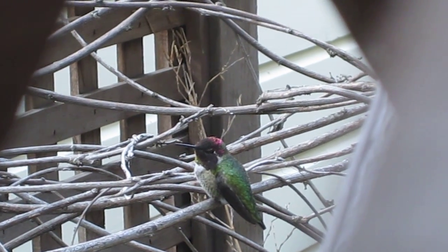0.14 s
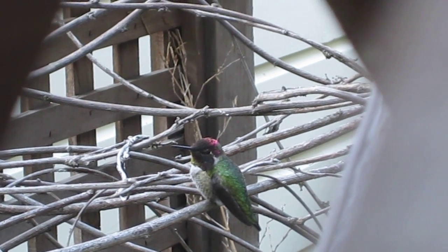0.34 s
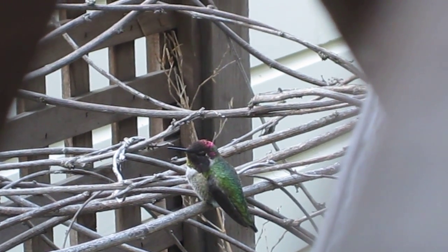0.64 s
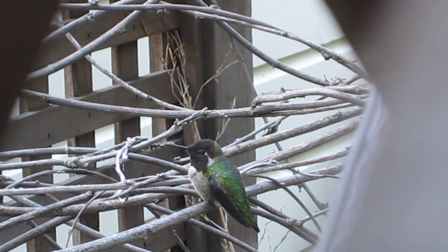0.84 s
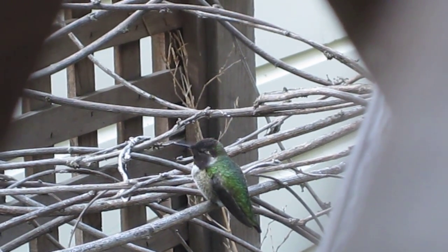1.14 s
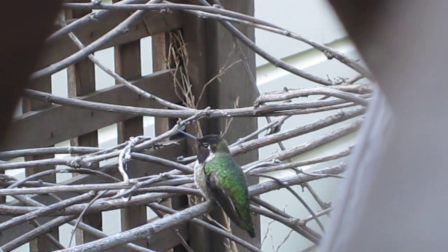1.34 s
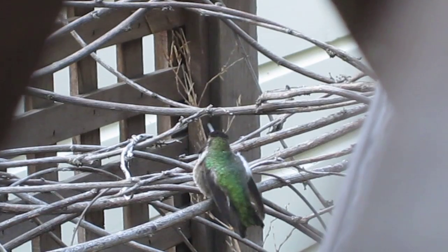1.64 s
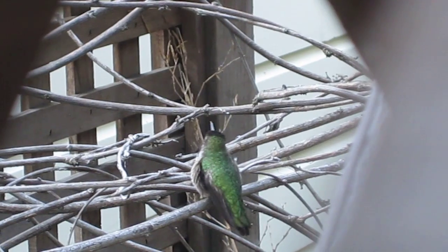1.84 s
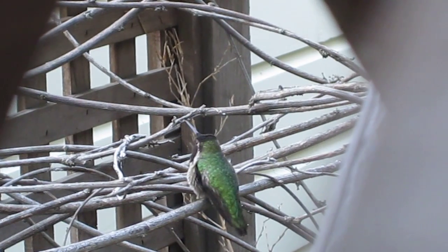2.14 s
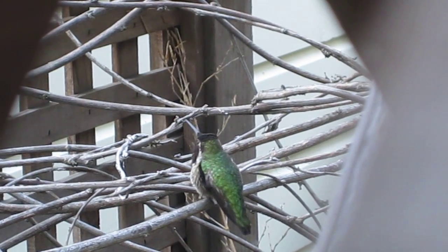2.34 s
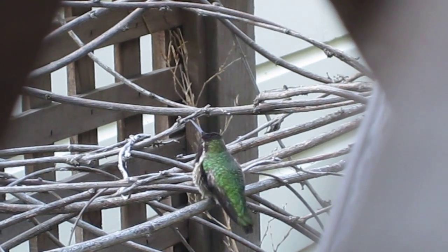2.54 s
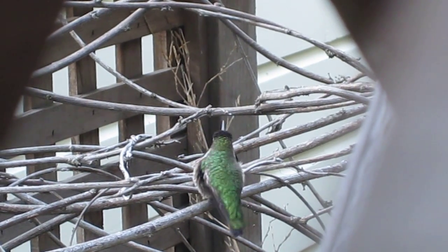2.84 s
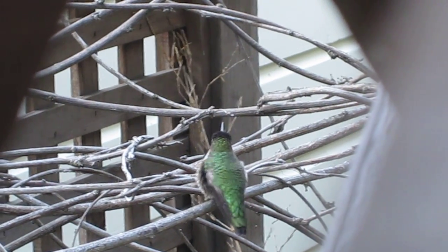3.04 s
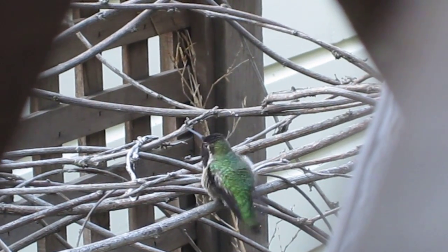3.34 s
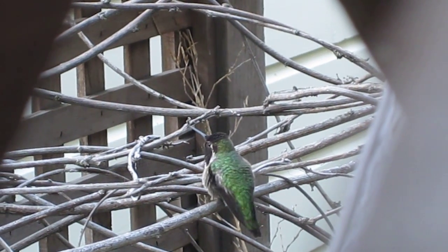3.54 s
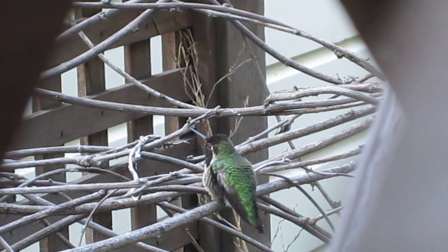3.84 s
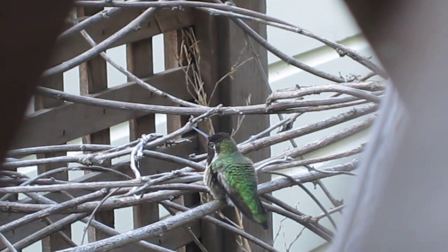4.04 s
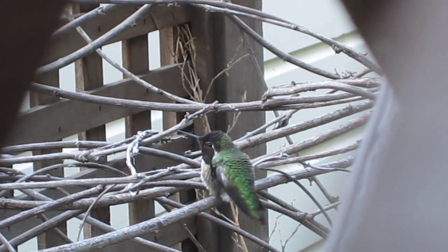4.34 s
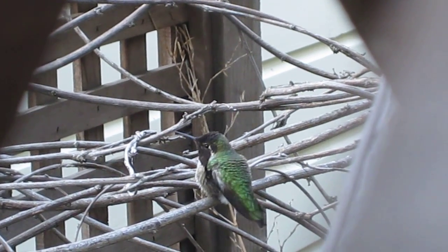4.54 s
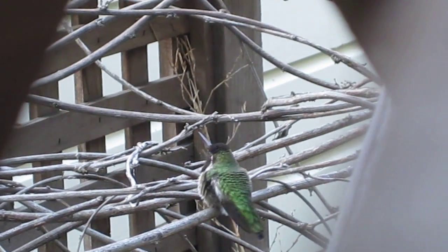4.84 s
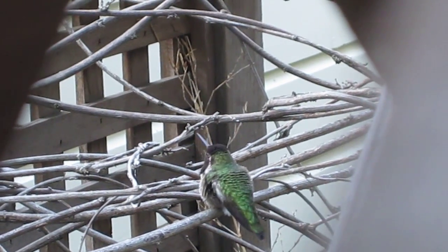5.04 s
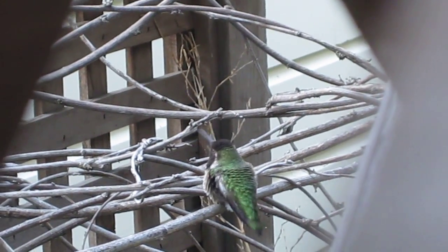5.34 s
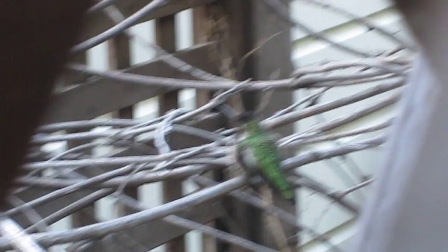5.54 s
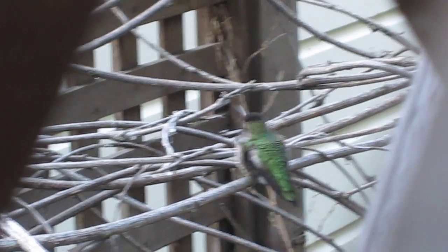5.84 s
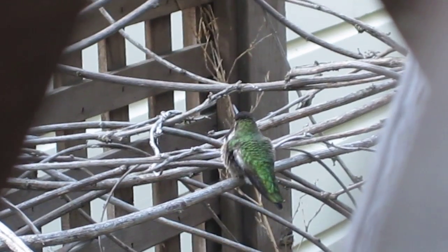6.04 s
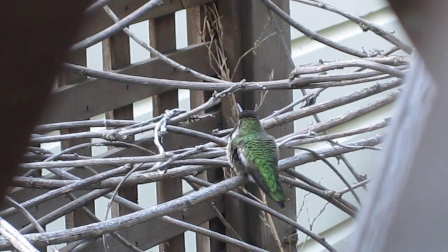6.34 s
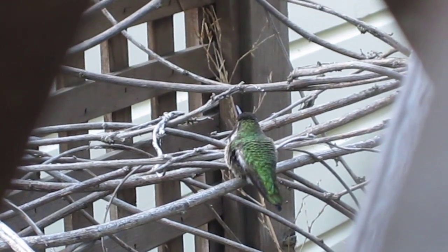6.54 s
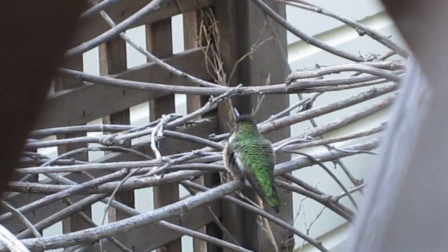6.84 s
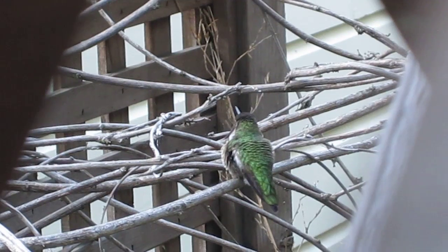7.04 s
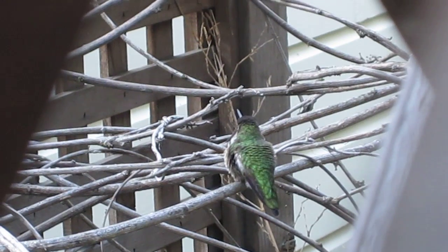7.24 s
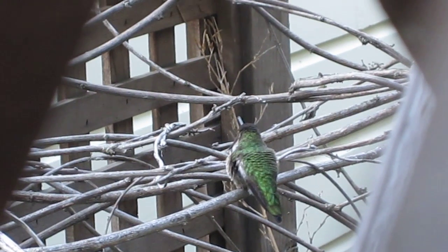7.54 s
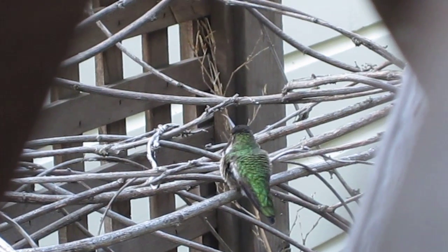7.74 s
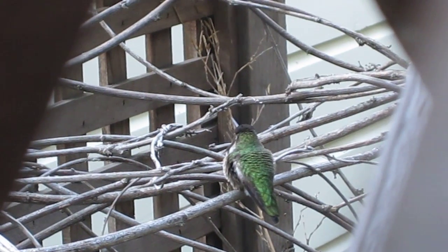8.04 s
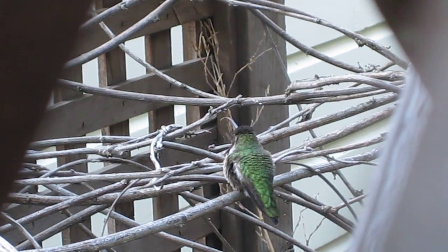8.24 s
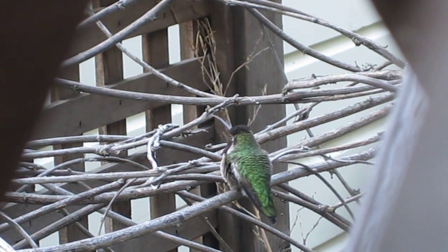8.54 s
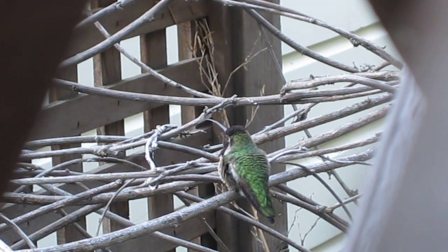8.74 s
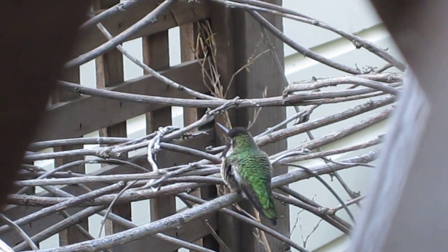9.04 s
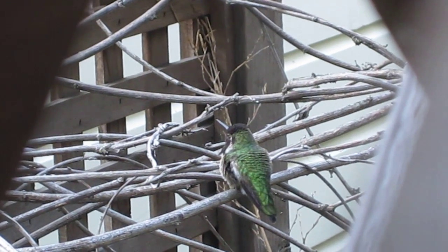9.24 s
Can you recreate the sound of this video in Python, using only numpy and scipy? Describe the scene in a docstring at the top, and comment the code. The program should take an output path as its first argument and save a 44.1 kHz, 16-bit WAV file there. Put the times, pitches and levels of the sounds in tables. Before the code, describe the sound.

Mono outdoor sound from a handheld camera: low hush, slowly swelling far traffic, steady faint whine. Weak, reverberant insect-like buzzes come first, quickly answered by a much louder hummingbird, its piercing whistled chips alternating with scratchy buzzes and close wooden reflections. The song ends abruptly; then irregular tiny ticks and a few sharp plastic housing clicks, the strongest midway, before quiet ambience remains.

```python
"""A hush with distant traffic and a whining camera; then a far hummingbird's faint buzzes,
answered by a near one singing a scratchy song from a vine on a wooden trellis. Later the camera's housing clicks.
Birds: gliding sines, roughened by random flutter, with echoes. Housing: decaying modes plus noise cracks.
Whine: wavering tones over resonant noise. Hush, traffic, rumble, bump and ticks: shaped noise."""
import sys
import numpy as np
from scipy import signal
from scipy.fft import rfft, irfft, next_fast_len
from scipy.io import wavfile
from scipy.ndimage import uniform_filter1d

SR = 44100
rng = np.random.default_rng(int(sys.argv[2]) if len(sys.argv) > 2 else 0)


def master(y):
    """Save y as 16-bit WAV."""
    cut = np.clip(np.atleast_2d(y).T, -1, 1)
    pcm = np.round(cut * 32767)  # scale
    wavfile.write(sys.argv[1], SR, pcm.astype(np.int16))


N = 413658
T_S = np.arange(N) / SR

# garden hush, relative spectrum: freq_hz, level_db
HUSH_SPECTRUM = [(20, -8), (55, -1.5), (120, 0.5), (180, -3.5), (350, 0), (520, -8.5), (800, -5),
                 (1200, -7), (1650, -9), (2200, -9), (3300, -19.5), (4300, -16.5), (8000, -20),
                 (16000, -33)]
# far traffic swell: time_s, level_db
TRAFFIC_LEVEL = [(0, -58.5), (3.2, -52.5), (5.6, -51), (7.6, -51.5), (9.38, -50.5)]
# low rumble: time_s, level_db
RUMBLE_LEVEL = [(0, -70), (4.3, -65.5), (6.95, -59), (7.25, -72), (9.38, -78)]
# camera whine tones: freq_hz, level_db, phase_sway_rad
WHINE_TONES = [(362.5, -61, 0.0041), (733.4, -60, 0.42), (1112, -58, 0), (1580, -62, 0.25),
               (1615, -66, 0.52), (1865.5, -59, 0.74), (1890, -59, .3), (2156, -66, .25),
               (2176, -53.5, 0.76), (2459, -69, 0.038), (2468, -61, 0.8), (2704, -73, 0.57),
               (2755, -75, .3), (3020, -72.5, 1.04), (4810, -69, 1.05), (5540, -66, 1.2),
               (5880, -71, 0.084), (7834, -67.5, 1.03)]
# resonant noise bands under the whine: centre_hz, width_hz, rms_db
WHINE_NOISE_BANDS = [(356, 180, -65), (730, 40, -56.5), (985, 67, -59), (1153, 85, -55), (1314, 33, -62),
                     (1788, 64, -66), (2268, 120, -60.5), (3026.5, 57, -65.5), (5510, 190, -71)]
# whine gain over time: time_s, gain_db
WHINE_GAIN = [(0, 0), (3.5, -0.5), (5.5, 0.5), (7, 1.5), (9.38, 1)]
# far bird's buzzes: start_s, level_db
FAR_BUZZES = [(.135, -58.5), (.342, -59.5), (.526, -60), (.685, -59.5), (.89, -62), (1.04, -60),
              (1.222, -58), (1.411, -58), (1.6, -59)]
# whistled chips: crest_s, level_db, rebound_share (of the plunge), trill_s (none below MIN_TRILL_S)
CHIPS = [(1.654, -33, .5, 0.041), (1.846, -32, .6, .026), (2.018, -32, 0.67, .025),
         (2.192, -30.5, 0.42, 0.027), (2.369, -28.5, 0.76, 0.026), (2.549, -28, 0.91, 0.0038),
         (2.752, -30, 0.99, 0), (2.894, -30, 0.074, 0), (3.027, -29.5, 1, 0), (3.171, -30, .1, 0),
         (3.316, -30.5, 0.031, 0), (3.468, -31.5, 0.031, 0)]
# near bird's short buzzes: start_s, rasp_db
BUZZES = [(1.761, -33.5), (1.931, -33), (2.103, -30.5), (2.281, -30.5), (2.455, -30.5), (2.574, -29.5),
          (2.660, -31), (2.779, -31.5), (2.927, -33), (3.063, -33.5), (3.200, -31), (3.357, -32.5),
          (3.500, -32)]
# chip crest pitch, sagging through the song: time_s, pitch_hz
CREST_PITCH = [(1.646, 14000), (1.662, 10960), (1.85, 10970), (2.4, 10390), (2.9, 9850), (3.47, 9630)]
# echoes off trellis and wall: delay_s, level_db
ECHOES = [(.00335, -5), (.0077, -13), (0.0108, -18), (.015, -19), (.0261, -52)]
# small ticks and taps: start_s, peak_db, centre_hz
TICKS = [(4.5378, -29.5, 6670), (4.768, -32, 6330), (5.1229, -28.5, 8700), (5.3140, -32, 9400),
         (5.3182, -33, 6700), (5.5300, -24.5, 5240), (5.6585, -29, 1230), (5.9315, -35, 8300),
         (6.2980, -36.5, 4300), (6.7625, -35.5, 6780)]
# housing clicks: start_s, level_db, brightness_db_per_octave, low_edge_hz, node_hz
CLICKS = [(4.7975, -4, 2, 400, 1360), (4.8003, -23, 5, 400, 7000), (5.3137, -18.5, -3.5, 150, 2910),
          (5.4820, -32, -7, 300, 2020), (5.525, -35, 1, 1400, 3700), (5.5300, -14.5, -0.5, 900, 3600),
          (5.5530, -32, -6.5, 400, 2000)]
# housing modes: freq_hz, level_db, t60_s
HOUSING_MODES = [(236, -31, 0.11), (370, -25.5, 0.054), (742, -12.5, 0.019), (970, -19, 0.078),
                 (1143, -8.5, 0.014), (1540, -9.5, 0.018), (1840, 3.5, 0.0062), (2086, 3.5, 0.0046),
                 (2580, -27.5, 0.078), (2796, -18, 0.017), (3490, -23, 0.025), (3380, -18.5, 0.0098),
                 (3850, -3, 0.0046), (5100, -6, 0.0021), (6700, -6.5, 0.0018), (10400, -21.5, 0.0023)]

WHINE_SWAY_HZ, WHINE_WAVER_HZ, WHINE_FLICKER_DB = 30.05, 1.466, 1.5
FAR_TRILL_S, FAR_RASP_S, FAR_HZ, FAR_SAG_HZ_PER_S = .033, .013, 8900, 500
CHIP_RISE_S, PLUNGE_S, FLICK_S = .008, .006, .0043
CHIP_TAIL_S, CUT_TAIL_S, MIN_TRILL_S = .0056, .0021, .01  # a trill cuts the chip's tail short
ENTRY_SHARE, VALLEY_SHARE, VALLEY_SINK_PER_S = .93, .76, .118  # of crest pitch; later chips plunge deeper
TAIL_SHARE = .707  # of valley pitch
THROAT_HZ, THROAT_LOSS_DB = 7800, 17.5  # loudest chip pitch; loss an octave away
TRILL_HZ, TRILL_DB, TRILL_RASP_DB, TRILL_RASP_S = 8500, -32, -35, .013
BUZZ_HZ, BUZZ_TRILL_S, BUZZ_SOFTER_DB = 7980, .018, 10.5  # pitch at mid-song
BUZZ_FOLLOWS = .413  # exponent on the crest pitch ratio
RASP_S, RASP_SHRINK_S_PER_S = .0155, .00303  # length at the first chip; later rasps are shorter
BUMP_S, BUMP_HALF_S, BUMP_HZ, BUMP_DB = 3.27, .089, 280, -51.5
TICK_DECAY_S, TICK_DECAY_SLOPE = .0024, .6  # at 1 kHz; higher ticks die sooner by this power
CUTOFF_HZ = 15900


def from_db(db):
    """Decibels to gain."""
    return 10 ** (np.asarray(db) / 20)


def rms_one(x):
    """Scale to an rms of 1."""
    return x / np.sqrt(np.mean(x ** 2) + 1e-20)


def add(out, start_s, sound):
    """Mix a sound in at a time."""
    at = round(start_s * SR)
    out[at:at + len(sound)] += sound[:len(out) - at]


def band(x, low_hz, high_hz, order=2):
    """Band-pass."""
    edges_hz = [low_hz, min(high_hz, .48 * SR)]
    return signal.sosfilt(signal.butter(order, edges_hz, "band", fs=SR, output="sos"), x)


def noise_band(low_hz, high_hz, order=2):
    """Full-length band of noise at rms 1."""
    return rms_one(band(rng.standard_normal(N), low_hz, high_hz, order))


def wander(per_s, t):
    """Random line joining unit-variance normal knots at a given rate."""
    knots = np.arange(int(t[-1] * per_s) + 2)
    return np.interp(t * per_s, knots, rng.standard_normal(len(knots)))


def coloured(spectrum):
    """Noise with a given spectrum; rms 1."""
    hz, db = np.transpose(spectrum)
    size = next_fast_len(N)
    bins_hz = np.maximum(np.arange(size // 2 + 1) * SR / size, 1)
    gain = from_db(np.interp(np.log(bins_hz), np.log(hz), db))
    return rms_one(irfft(rfft(rng.standard_normal(size)) * gain, size)[:N])


def background():
    """Steady hush, slowly swelling far traffic and low rumble, all from filtered noise."""
    traffic_gain = from_db(np.interp(T_S, *np.transpose(TRAFFIC_LEVEL)))
    traffic = traffic_gain * noise_band(412, 1550)
    rumble_gain = from_db(np.interp(T_S, *np.transpose(RUMBLE_LEVEL)))
    rumble = rumble_gain * noise_band(49, 64)
    return from_db(-49) * coloured(HUSH_SPECTRUM) + traffic + rumble


def camera_whine():
    """Wavering tones, phase-swayed together about 30 times a second, over resonant noise bands."""
    frame_sway = np.sin(2 * np.pi * WHINE_SWAY_HZ * T_S)
    out = np.zeros(N)
    for hz, db, sway_rad in WHINE_TONES:
        gain = from_db(db + WHINE_FLICKER_DB * wander(7, T_S))
        hz_now = hz + WHINE_WAVER_HZ * wander(12, T_S)
        phase = 2 * np.pi * np.cumsum(hz_now) / SR
        out += gain * np.sin(phase + sway_rad * frame_sway)
    for hz, width_hz, db in WHINE_NOISE_BANDS:
        out += from_db(db) * noise_band(hz - width_hz / 2, hz + width_hz / 2, order=1)
    return from_db(np.interp(T_S, *np.transpose(WHINE_GAIN))) * out


def syrinx(hz, overtone_db):
    """A gliding tone whose octave gets through the beak mainly on low notes."""
    phase = 2 * np.pi * np.cumsum(hz) / SR
    octave = from_db(overtone_db) / (1 + (np.abs(hz) / 6600) ** 12)
    return np.sqrt(2) * (np.sin(phase) + octave * np.sin(2 * phase))


def buzz(trill_s, rasp_s, pitch_hz, trill_db, rasp_db, swing=.1488, throb_db=4.5, sag=.92,
         end_hz=4450, rough=.15):
    """Membranes flutter, swinging pitch and level; as tension drops the note tumbles into a rough rasp."""
    steps_s = [0, trill_s / 3, trill_s * 2 / 3, rasp_s * .4, rasp_s * .35, rasp_s * .25, .003]
    knots_s = np.cumsum(steps_s)
    t = np.arange(int(knots_s[-1] * SR)) / SR
    low_hz = end_hz * (rasp_s / .01325) ** -.3  # a longer rasp falls further
    centre_hz = np.interp(t, knots_s, [pitch_hz, pitch_hz, sag * pitch_hz, 7100, 5700, low_hz, low_hz])
    db = np.interp(t, knots_s, [trill_db - 4, trill_db, (trill_db + rasp_db) / 2,
                                rasp_db - 3, rasp_db, rasp_db - 7, rasp_db - 24])
    breaking = np.interp(t, [knots_s[2], (knots_s[3] + knots_s[4]) / 2], [0, 1])
    flutter_hz = 345 * (1 + .101 * wander(307, t))
    cycle = 2 * np.pi * np.cumsum(flutter_hz) / SR
    jitter = (.035 + rough * breaking) * wander(4500, t)
    hz = centre_hz * (1 + swing * np.sin(cycle) + jitter)
    # loudest on each upswing, no two alike
    throb_now_db = throb_db * (1 - breaking / 2) * np.sin(cycle + 1.756) + 1.4 * wander(300, t)
    grain_db = 3.5 * breaking * wander(2054, t)
    throb = rms_one(from_db(throb_now_db + grain_db))
    return from_db(db) * throb * syrinx(hz, overtone_db=-22 + 16.3 * breaking)


def garden(x, wet_db, t60_s):
    """Twigs, slats and walls scatter the song into a diffuse noise tail."""
    t = np.arange(SR) / SR
    tail = band(rng.standard_normal(len(t)), 1300, 9400, order=1)
    tail *= from_db(-60 * t / t60_s) * (1 - np.exp(-t / .0024))
    return from_db(wet_db) * signal.fftconvolve(x, tail / np.sqrt(np.sum(tail ** 2)))[:N]


def far_bird():
    """Far buzzes sag in pitch and carry a strong scattered tail."""
    song = np.zeros(N)
    for start_s, db in FAR_BUZZES:
        pitch_hz = FAR_HZ - FAR_SAG_HZ_PER_S * start_s
        add(song, start_s, buzz(FAR_TRILL_S, FAR_RASP_S, pitch_hz, db, db, swing=.2))
    return song + garden(song, wet_db=-1.5, t60_s=1)


def crest_hz(time_s):
    """Crest pitch of the song at a time."""
    return np.interp(time_s, *np.transpose(CREST_PITCH))


def chip(crest_s, rebound, tail_s):
    """A pure whistle swells to its crest, plunges, flicks back up and falls away."""
    steps_s = [0, CHIP_RISE_S / 2, CHIP_RISE_S / 2, PLUNGE_S / 2, PLUNGE_S / 2, FLICK_S,
               tail_s * .4, tail_s * .6, .002]
    knots_s = np.cumsum(steps_s)
    t = np.arange(int(knots_s[-1] * SR)) / SR
    valley = VALLEY_SHARE - VALLEY_SINK_PER_S * (crest_s - CHIPS[0][0])
    flick = valley + rebound * (1 - valley)
    end = TAIL_SHARE * valley
    shape = np.interp(t, knots_s, [ENTRY_SHARE, (ENTRY_SHARE + 4) / 5, 1, (1 + 2 * valley) / 3,
                                   valley, flick, valley, end, end])
    hz = uniform_filter1d(shape * crest_hz(crest_s - CHIP_RISE_S + t), size=40)
    db = np.interp(t, knots_s, [-11.5, -4, 0, -1.5, -1.5, -1.5, -3.5, 0, -25])
    fraying = np.interp(t, knots_s[2:4], [0, 1])  # past the crest, pitch frays and level stutters
    db = db - THROAT_LOSS_DB * np.log2(hz / THROAT_HZ) ** 2 + 4 * fraying * wander(932, t)
    onset = np.minimum(t / .00097, 1)
    frayed_hz = hz * (1 + .043 * fraying * wander(2480, t))
    return from_db(db) * onset * syrinx(frayed_hz, overtone_db=-7)


def near_bird():
    """Chips and buzzes, with breath noise and echoes from the wood close behind the perch."""
    song = np.zeros(N)
    for crest_s, db, rebound, trill_s in CHIPS:
        runs_on = trill_s > MIN_TRILL_S
        tail_s = CUT_TAIL_S if runs_on else CHIP_TAIL_S
        whistle = chip(crest_s, np.clip(rebound, 0, 1), tail_s)
        add(song, crest_s - CHIP_RISE_S, from_db(db) * whistle)
        if runs_on:
            trill = buzz(trill_s, TRILL_RASP_S, TRILL_HZ, TRILL_DB, TRILL_RASP_DB,
                         swing=.155, throb_db=3.2, sag=.91, end_hz=4650, rough=.11)
            add(song, crest_s + PLUNGE_S, trill)
    mid_song_hz = crest_hz(np.mean([start_s for start_s, _ in BUZZES]))
    for start_s, db in BUZZES:
        pitch_hz = BUZZ_HZ * (crest_hz(start_s) / mid_song_hz) ** BUZZ_FOLLOWS
        rasp_s = RASP_S - RASP_SHRINK_S_PER_S * (start_s - CHIPS[0][0])
        add(song, start_s, buzz(BUZZ_TRILL_S, rasp_s, pitch_hz, db - BUZZ_SOFTER_DB, db, swing=.12))
    # air rushing through the syrinx
    spray = from_db(-33) * band(song * rng.standard_normal(N), 5000, 17000)
    song = band(song, 3700, 12590, order=3) + spray
    echoes = sum(from_db(db) * np.interp(T_S - delay_s, T_S, song) for delay_s, db in ECHOES)
    return song + echoes + garden(song, wet_db=-7.5, t60_s=.38)


def bump():
    """A dull swell of low noise as the hand's grip shifts on the camera."""
    swell = np.exp(-((T_S - BUMP_S) / BUMP_HALF_S) ** 2)
    return from_db(BUMP_DB) * swell * noise_band(BUMP_HZ / 1.6, BUMP_HZ * 1.7)


def ticks():
    """Tiny snaps and taps: band-passed noise dying within milliseconds."""
    out, t = np.zeros(N), np.arange(int(.02 * SR)) / SR
    for start_s, db, hz in TICKS:
        decay_s = TICK_DECAY_S * (hz / 1000) ** -TICK_DECAY_SLOPE
        burst = rng.standard_normal(len(t)) * np.exp(-t / decay_s)
        snap = band(burst, hz / 1.23, hz * 1.24)
        add(out, start_s, from_db(db) * snap / np.abs(snap).max())
    return out


def housing():
    """Each creak of the grip snaps the plastic shell's modes, with its own brightness and node."""
    out, t = np.zeros(N), np.arange(int(.15 * SR)) / SR
    hz, mode_db, t60_s = np.transpose(HOUSING_MODES)[:, :, None]
    rings = np.sin(2 * np.pi * hz * t) * from_db(mode_db - 60 * t / t60_s)
    signs = (-1) ** np.arange(len(HOUSING_MODES))[:, None]
    for start_s, db, brightness, low_hz, node_hz in CLICKS:
        # modes with a node at the spot stay weak
        node_db = -11 * np.exp(-(np.log2(hz / node_hz) / .23) ** 2)
        mode_gain = from_db(node_db + brightness * np.log2(hz / 2000))
        body = np.sum(signs * rings * mode_gain, axis=0)
        crack = from_db(-17) * band(rng.standard_normal(len(t)), 500, 12000) * np.exp(-t / .0015)
        add(out, start_s, from_db(db) * band(body + crack, low_hz, 15600))
    tail = band(rng.standard_normal(len(t)), 300, 3900) * from_db(-60 * t / .2)
    return out + from_db(-50) * signal.fftconvolve(out, tail)[:N]


def scene():
    """Sum of all sources in one channel."""
    ambience = background() + camera_whine()
    birds = far_bird() + near_bird()
    handling = bump() + ticks() + housing()
    return (ambience + birds + handling)[None]


def record(dry):
    """Steep elliptic low-pass cuts the top."""
    return signal.sosfilt(signal.ellip(10, .1, 80, CUTOFF_HZ, fs=SR, output="sos"), dry)


dry = scene()
out = record(dry)
master(out)
```